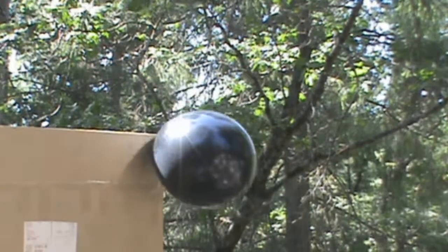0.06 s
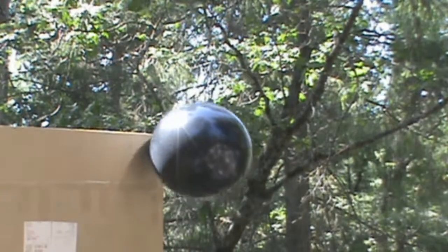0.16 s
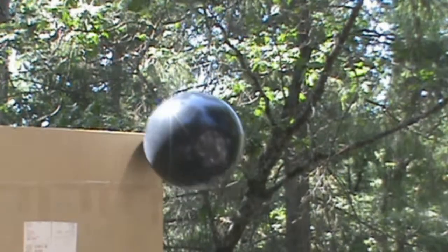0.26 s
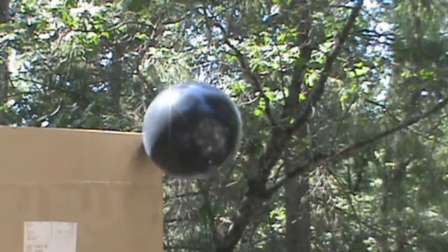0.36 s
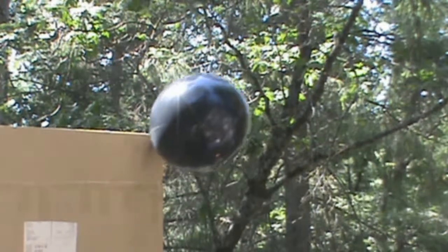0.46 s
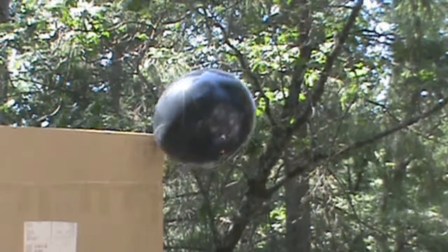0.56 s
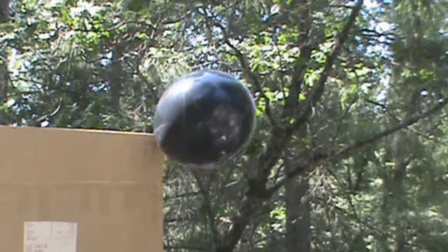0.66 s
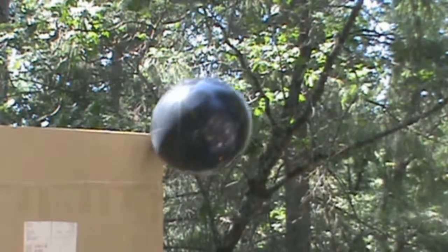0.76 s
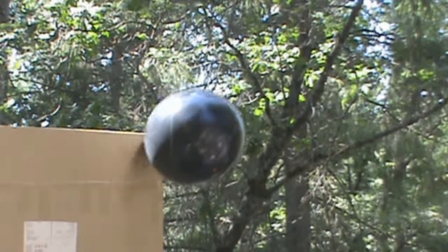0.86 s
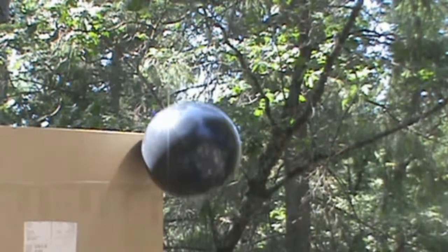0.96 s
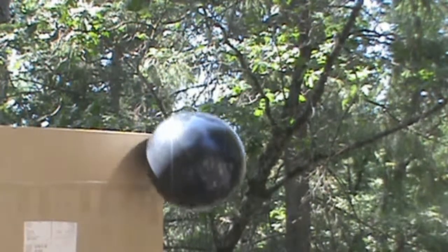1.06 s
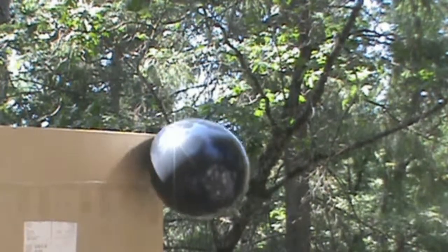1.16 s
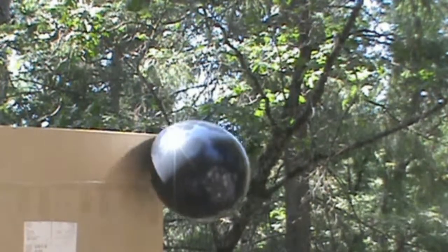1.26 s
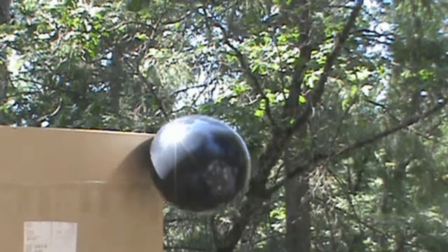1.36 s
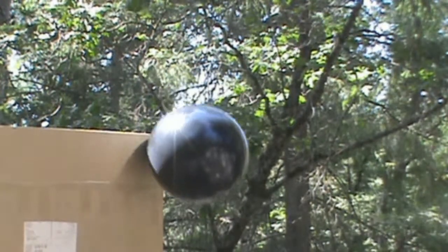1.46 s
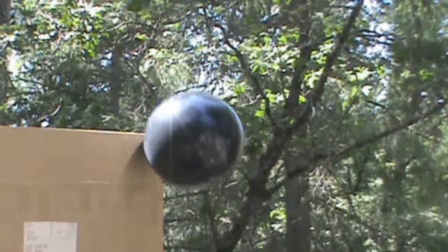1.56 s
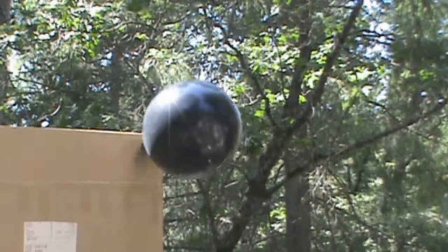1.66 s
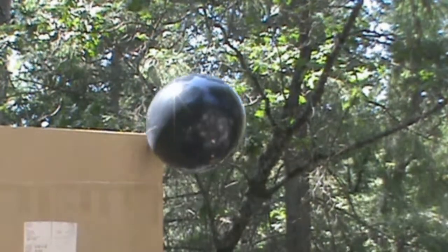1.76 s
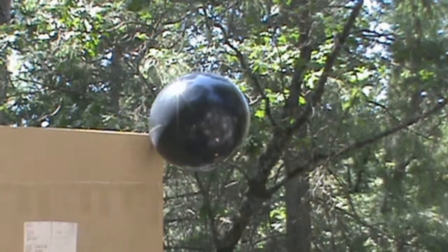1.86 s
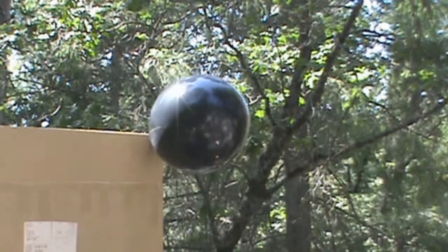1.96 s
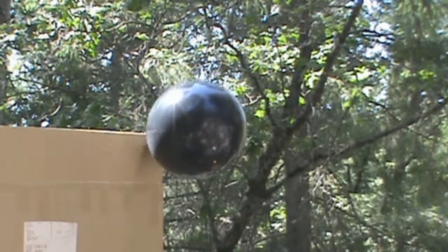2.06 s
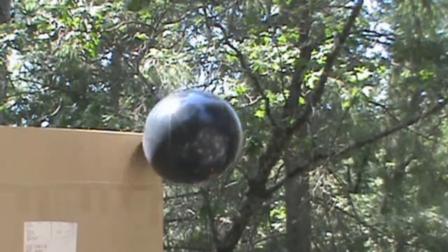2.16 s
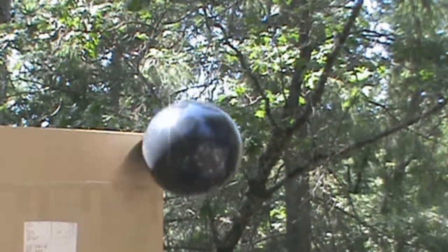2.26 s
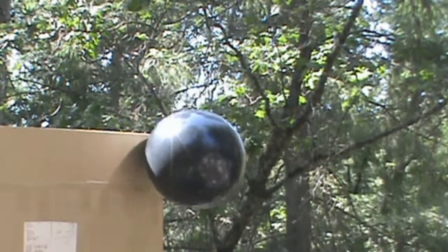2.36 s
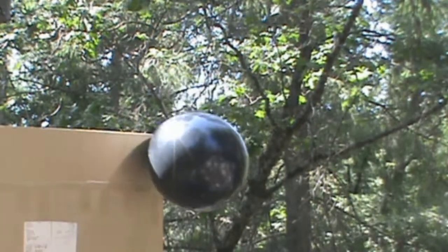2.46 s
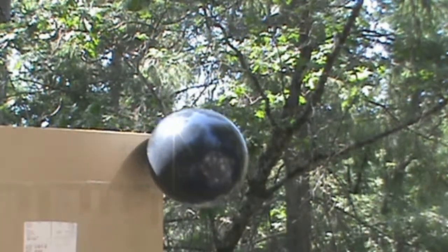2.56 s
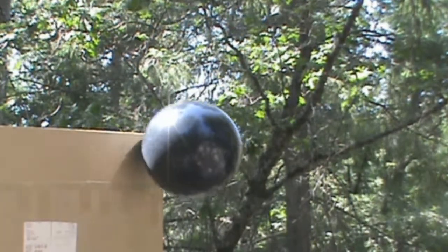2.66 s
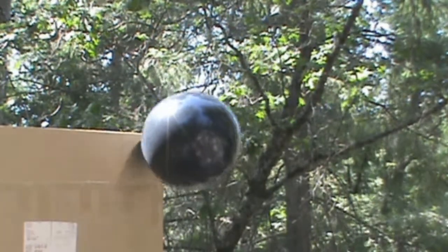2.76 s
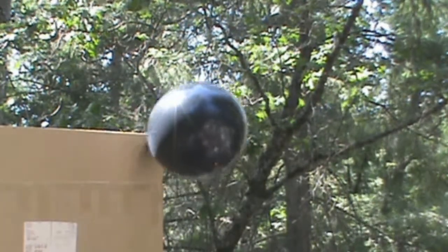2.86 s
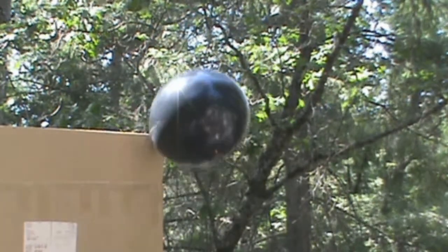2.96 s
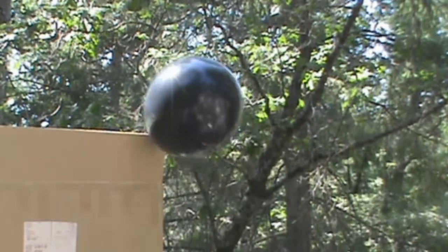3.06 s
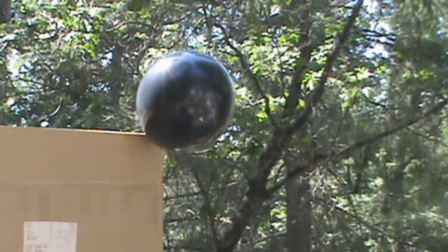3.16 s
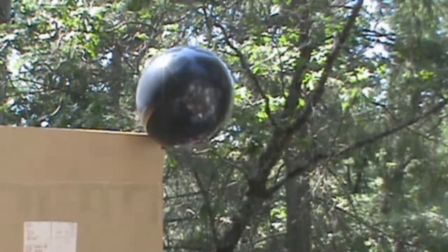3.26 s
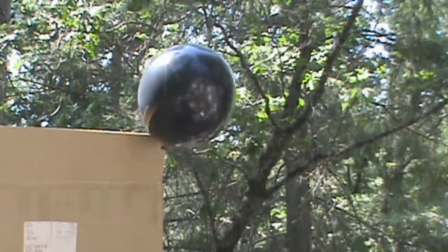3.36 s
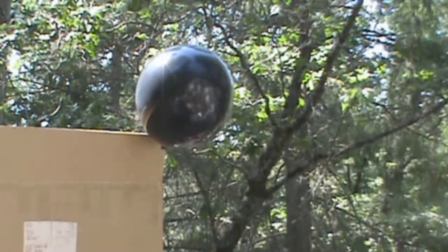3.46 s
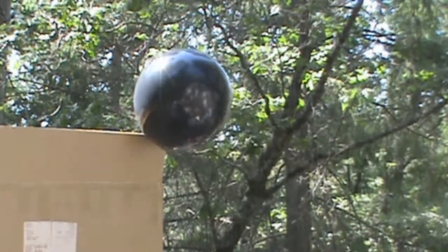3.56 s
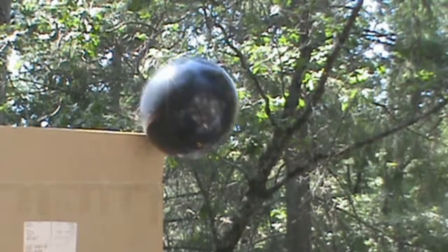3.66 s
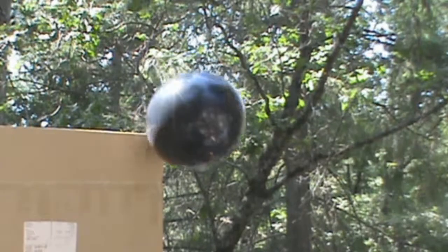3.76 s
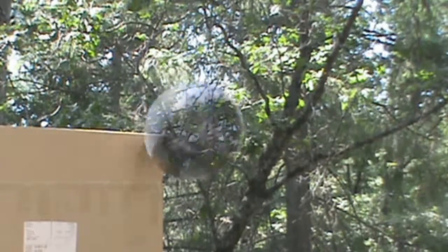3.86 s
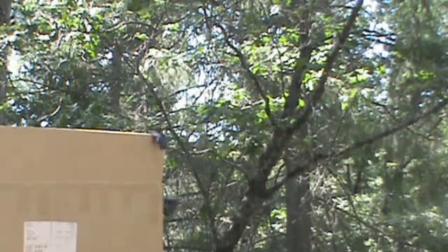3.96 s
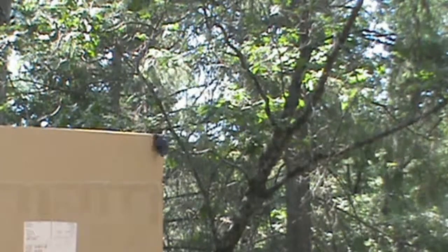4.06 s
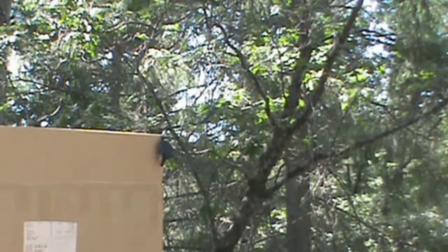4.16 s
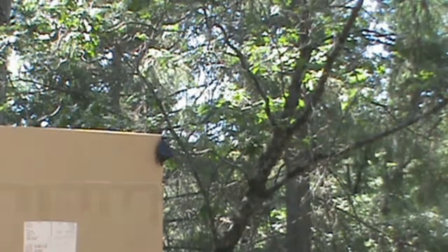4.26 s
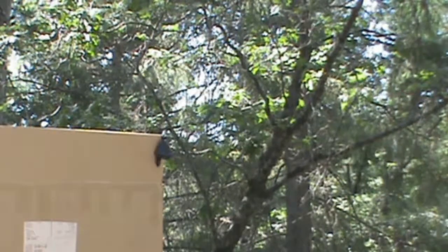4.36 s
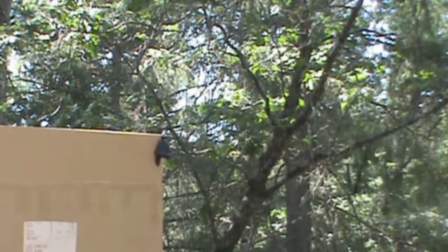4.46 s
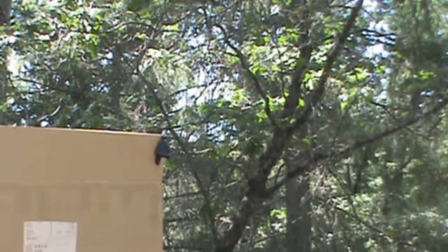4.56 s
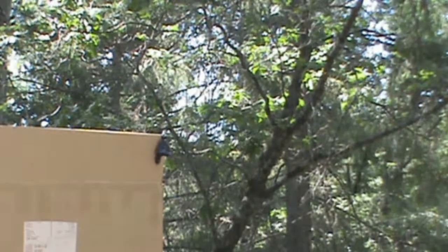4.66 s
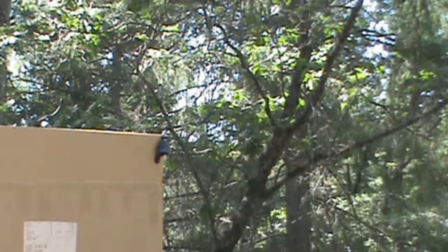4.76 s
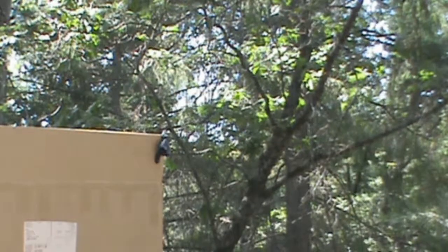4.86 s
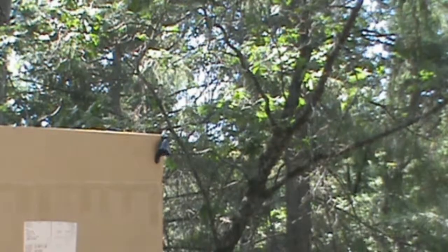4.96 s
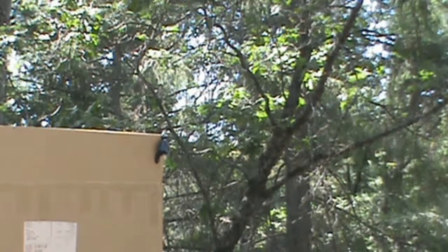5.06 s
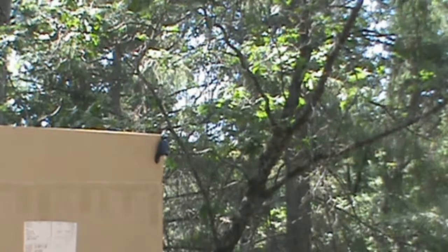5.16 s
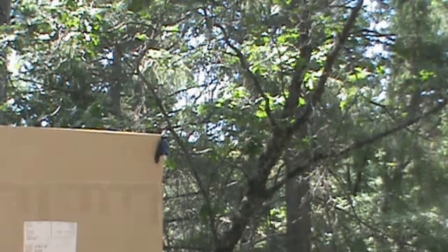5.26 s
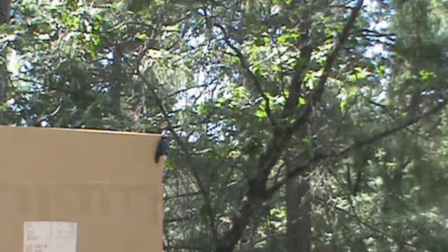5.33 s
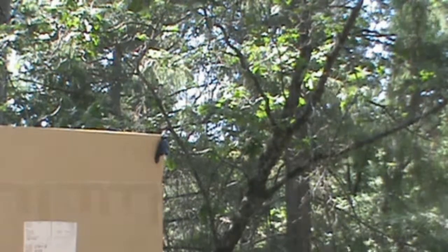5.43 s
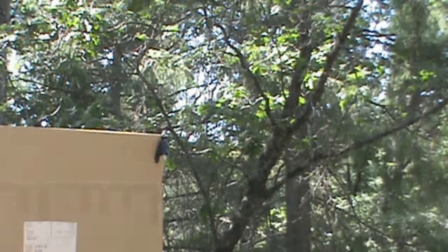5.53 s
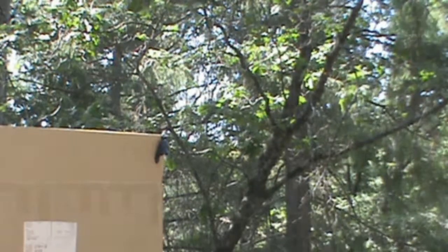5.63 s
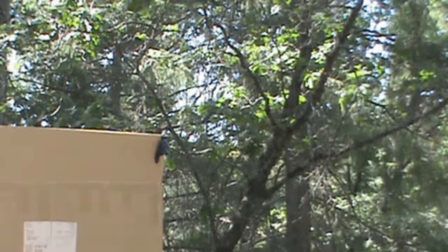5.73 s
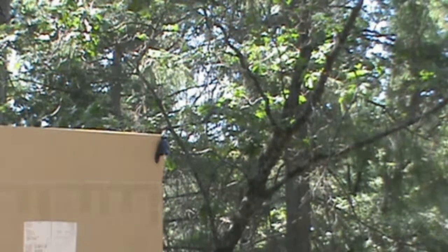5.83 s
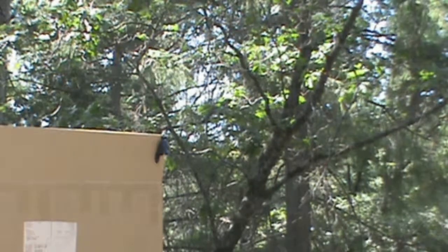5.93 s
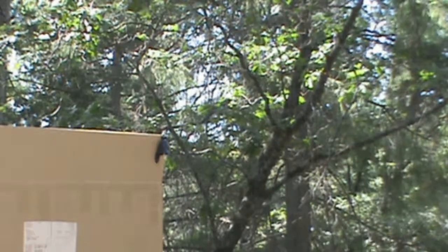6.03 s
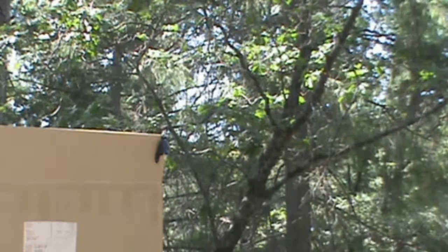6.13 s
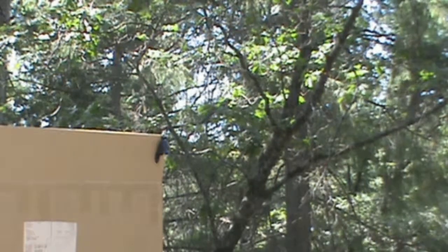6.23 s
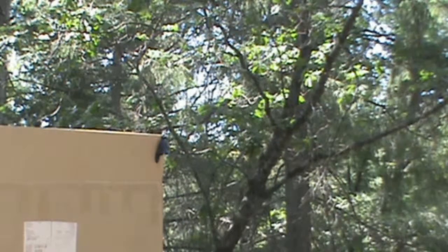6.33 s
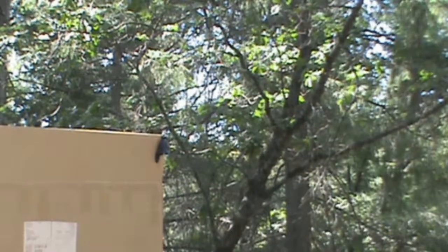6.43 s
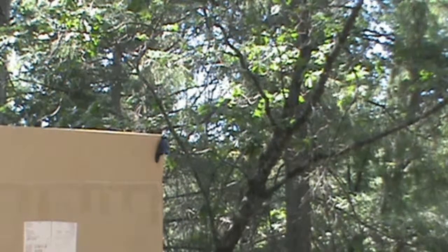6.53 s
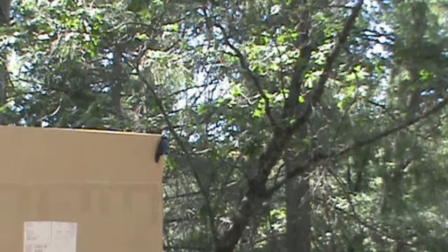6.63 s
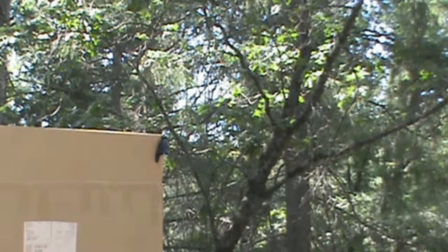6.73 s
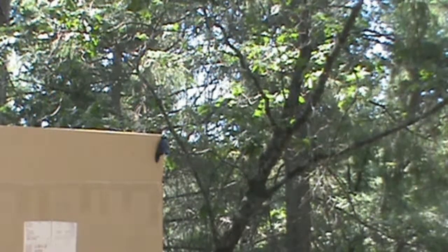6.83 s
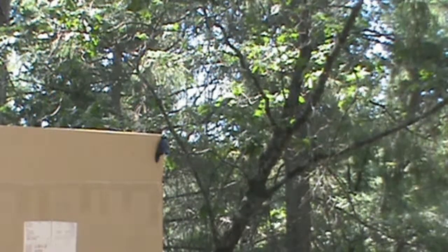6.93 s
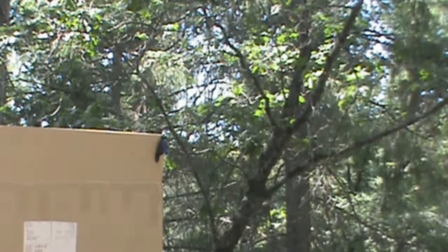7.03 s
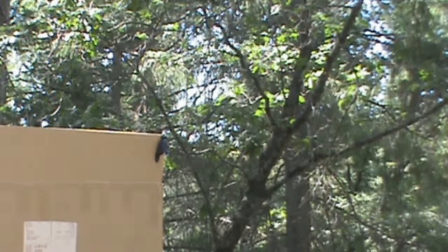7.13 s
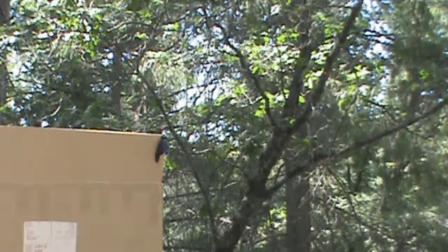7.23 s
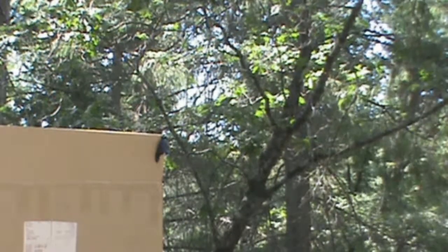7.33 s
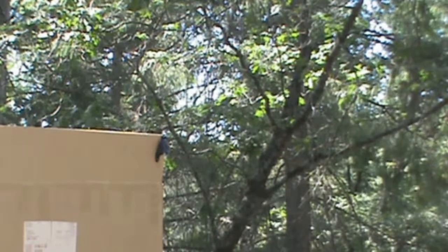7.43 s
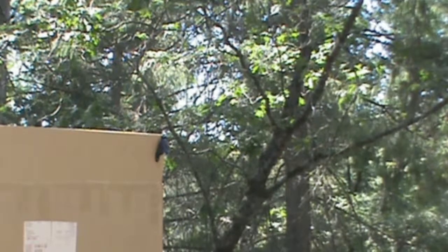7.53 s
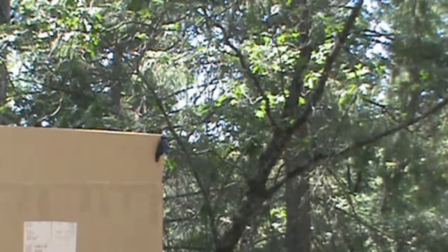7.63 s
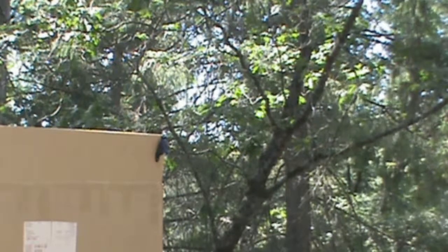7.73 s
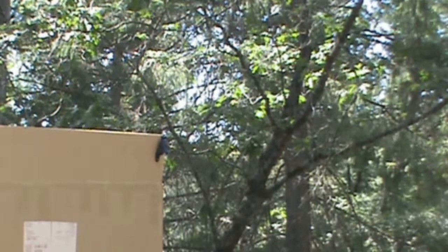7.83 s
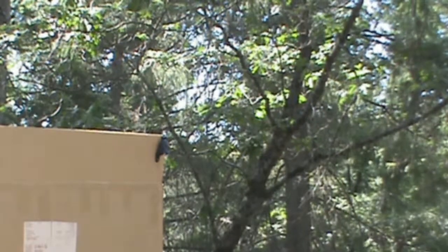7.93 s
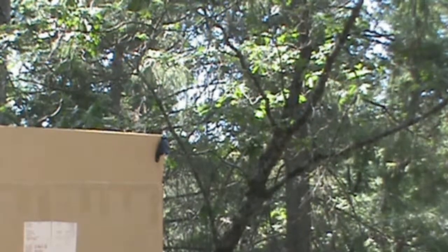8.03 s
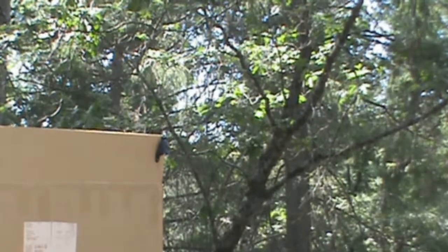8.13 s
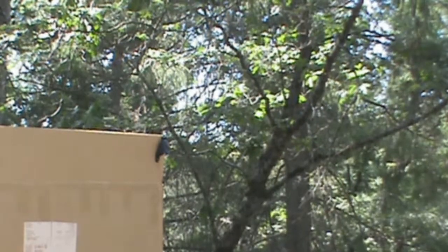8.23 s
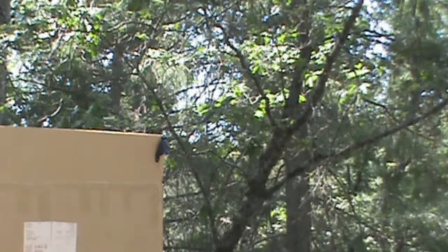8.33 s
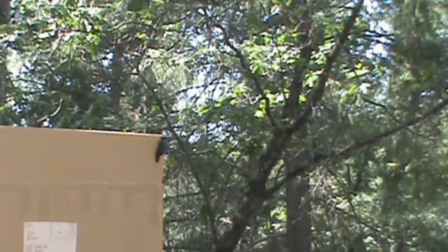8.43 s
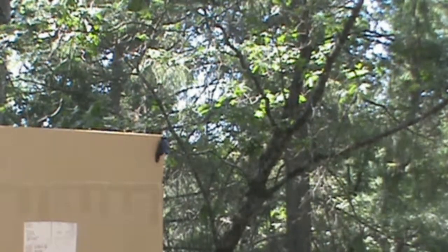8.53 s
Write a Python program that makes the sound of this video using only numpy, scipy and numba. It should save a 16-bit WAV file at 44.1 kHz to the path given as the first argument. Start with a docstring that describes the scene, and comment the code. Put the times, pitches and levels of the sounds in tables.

```python
"""Over a soft rush of distant air a latch ticks, parts scrape and click, and a launcher charges with a hiss.
Its firing valve squeaks open, hisses and cracks as the skewer leaves; a balloon bursts in a pressure wave.
After more handling a puff thumps out of the barrel, then come faint chirps and a thin whistle.
Hisses are shaped noise, clicks are noise bursts that ring the parts, echoes are convolved scatter.
A limiter holds the blasts down."""
import sys
import numpy as np
from scipy import signal
from scipy.fft import rfft, irfft, next_fast_len
from scipy.io import wavfile
from scipy.ndimage import uniform_filter1d
from numba import njit

SR = 44100
rng = np.random.default_rng(int(sys.argv[2]) if len(sys.argv) > 2 else 0)


def transcribe(u):
    """Save the signal u as a 16-bit wav file named by the first command-line argument.

    u: samples, shape (n,) or (channels, n), limited to [-1, 1]; the rate is SR.
    q: integer samples, one column per channel.
    """
    v = np.clip(np.atleast_2d(u).T, -1, 1)
    q = np.round(v * 32767).astype(np.int16)
    wavfile.write(sys.argv[1], SR, q)


N = 378995

# Barrel resonances that colour escaping air. Each row: centre in Hz, width in Hz, relative level in dB.
BARREL_RESONANCES = [(5470, 500, -17), (8130, 620, 1), (9200, 700, -2), (9800, 700, -3), (11100, 500, -2),
                     (11870, 600, 0)]


def undb(db):
    """Decibels to gain."""
    return 10 ** (np.asarray(db) / 20)


def unit(x):
    """Scale to rms 1."""
    return x / np.sqrt(np.mean(x ** 2))


def clock():
    """Time of every sample in seconds."""
    return np.arange(N) / SR


def lookup(rows, hz):
    """Interpolate (Hz, value) rows on a log-frequency axis."""
    points_hz, values = np.transpose(rows)
    return np.interp(np.log(hz), np.log(points_hz), values)


def shape(x, gain):
    """Filter by a gain that is a function of frequency."""
    size = next_fast_len(x.shape[-1])
    hz = np.maximum(np.arange(size // 2 + 1) * SR / size, 1)
    return irfft(rfft(x, size) * gain(hz), size)[..., :x.shape[-1]]


def colour(x, rows):
    """Filter by a gain curve of (Hz, dB) rows."""
    return shape(x, lambda hz: undb(lookup(rows, hz)))


def hump(x, centre_hz, octaves):
    """Keep one band with soft skirts."""
    return shape(x, lambda hz: 1 / (1 + (np.log2(hz / centre_hz) / octaves) ** 2 / 2) ** 2)


def dull(x, corner_hz):
    """Roll off the treble, 18 dB an octave."""
    return shape(x, lambda hz: 1 / np.hypot(1, (hz / corner_hz) ** 3))


def noise(count=N):
    """White noise."""
    return rng.standard_normal(count)


def place(x, pan_db):
    """Mono to stereo with a level difference; positive favours the left."""
    return x * undb(np.array([[pan_db], [-pan_db]]) / 2)


def add(out, s, x):
    """Mix x in at time s."""
    start = int(s * SR)
    out[..., start:start + x.shape[-1]] += x[..., :out.shape[-1] - start]


def gate(span_s, attack_s, release_s):
    """Gain that climbs its last 30 dB over the attack, holds to the span's end, then loses 30 dB per release."""
    t = clock()
    rise = np.minimum((t - span_s[0]) / attack_s - 1, 0)
    fall = np.maximum(t - span_s[1], 0) / release_s
    return undb(np.maximum(30 * (rise - fall), -200))


def bell(length_s):
    """Smooth rise and fall; each half lasts length_s, four standard deviations."""
    t = np.arange(-int(length_s * SR), int(length_s * SR)) / SR
    return np.exp(-8 * (t / length_s) ** 2)


def jet(flow, spectrum, flutter_db):
    """Turbulent air whose level follows the flow and flutters within milliseconds."""
    flutter = unit(uniform_filter1d(noise(), size=180))
    return unit(colour(noise(), spectrum)) * undb(flutter_db * flutter) * flow


def resonant(modes):
    """Turbulence heard through steep (Hz, width Hz, dB) resonances, rms 1."""
    def gain(hz):
        return sum(undb(db) / (1 + (2 * (hz - f) / width) ** 2) ** 2 for f, width, db in modes)
    return unit(shape(noise(), gain))


def pressure_wave(length_s, low_hz=110):
    """A sudden overpressure that swings through suction back to rest; a small source radiates no deep bass."""
    t = np.arange(int(.03 * SR)) / SR / length_s
    high_pass = signal.butter(2, low_hz, "high", fs=SR, output="sos")
    return signal.sosfilt(high_pass, (1 - t) * np.exp(-t))


def strike(s, peak_db, hz, octaves, t60, skirt_db=-12, ring_db=-37):
    """One contact: a brief crack with wide skirts, whose strongest band rings the launcher's parts faintly."""
    # Ringing parts. Each row: pitch in Hz, t60 in seconds, relative level in dB.
    part_rings = [(3406, 0.042, -6.5), (3500, 0.036, -10.5), (5070, 0.038, -6.5), (6020, 0.042, -18),
                  (7160, 0.041, 1.5), (8080, 0.0388, 6), (9700, 0.044, 6)]
    out, t = np.zeros(N), np.arange(int(.15 * SR)) / SR
    rings = sum(undb(db - 60 * t / ring_t60) * np.cos(2 * np.pi * f * t) for f, ring_t60, db in part_rings)
    body = undb(ring_db) * rings
    body[0] += 1  # direct sound
    lead_s = .005  # room for the filters to spread ahead of the contact
    contact = noise(len(t)) * undb(-60 * np.abs(t - lead_s) / t60) * (t >= lead_s)
    skirt = undb(skirt_db) * hump(contact, hz, octaves=1.9)
    hit = signal.fftconvolve(hump(contact, hz, octaves), body)[:len(t)] + skirt
    add(out, s - lead_s, hit * undb(peak_db) / np.abs(hit).max())
    return out


def forest_air(mid_db=-51, sway_db=0.47):
    """A soft rush from afar, nearly the same in both ears in the bass, swaying slightly in level."""
    # Spectrum. Each row: frequency in Hz, level in dB.
    air_spectrum = [(13, -39), (22, -9.5), (44, -1.5), (72, -11), (106, -1), (143, -7.5), (241, -5.5),
                    (326, -4.5), (454, -2), (686, -3), (1330, -13), (2870, -23), (3200, -22.5), (8620, -26),
                    (15800, -24)]
    # Stereo width. Each row: frequency in Hz, side minus mid in dB.
    side_spectrum = [(60, -18), (110, -22), (200, -16), (380, -15.5), (700, -10.5), (1290, -4.5),
                     (2380, -2.5), (4400, -4), (8120, -3), (15000, -10.5)]
    mid = colour(noise(), air_spectrum)
    side = colour(colour(noise(), air_spectrum), side_spectrum)
    sway = unit(hump(noise(), centre_hz=1.44, octaves=0.27))
    return (mid + side * np.array([[1], [-1]])) / np.std(mid) * undb(mid_db + sway_db * sway)


def latch(start_s=.0963, gap_s=.0049, peak_db=-20.5, hz=3350, first_pan_db=-13, pan_step_db=8):
    """A latch chatters over its teeth: three evenly spaced ticks, each further to the left."""
    ticks = [strike(start_s + k * gap_s, peak_db, hz, octaves=.22, t60=.008) for k in range(3)]
    return sum(place(tick, first_pan_db + k * pan_step_db) for k, tick in enumerate(ticks))


def scrapes(band_octaves=1.48, grit_db=3.5, hollow_db=-6.0, hollow_hz=330, top_hz=11000):
    """Sliding parts: dense tiny slips that swell and fade, and stir the hollow body."""
    # Each row: peak time in seconds, half-length in seconds, level of the main band in dB, centre in Hz.
    slides = [(0.244, 0.093, -43.5, 4400), (.34, 0.22, -54.5, 5500), (0.719, .07, -48.5, 2200),
              (1.03, .1, -57.5, 3520), (1.112, 0.067, -55, 2400), (1.611, 0.11, -47.5, 2870),
              (1.656, 0.075, -42, 2500), (1.711, .13, -42, 2970), (3.701, .06, -52.5, 1100),
              (5.521, .09, -52.5, 6030), (7.258, 0.17, -58.5, 2800), (8.03, .5, -59.5, 5350),
              (8.292, 0.28, -57.5, 4450)]
    out = np.zeros(N)
    for s, length_s, db, hz in slides:
        push = bell(length_s)
        grit = unit(uniform_filter1d(noise(len(push)), size=30))
        slips = noise(len(push)) * undb(grit_db * grit)
        hollow = undb(hollow_db) * unit(hump(slips, hollow_hz, octaves=2.0))
        rub = unit(hump(slips, hz, band_octaves)) + hollow
        add(out, s - length_s, rub * undb(db) * push)
    return place(dull(out, top_hz), pan_db=-3.5)


def clicks(octaves_at_2khz=.9):
    """Small parts click, the higher the narrower in band; the hollow body gives dull knocks."""
    # Small parts. Each row: time in seconds, peak in dB, centre in Hz, t60 in seconds.
    small_hits = [(.223, -31, 2200, 0.033), (0.251, -23, 14500, 0.016), (0.279, -32.5, 5170, 0.034),
                  (0.7878, -26.5, 4900, 0.054), (1.2936, -37.5, 6700, 0.011), (1.5079, -25, 1650, 0.0099),
                  (1.654, -25.5, 2590, 0.028), (1.732, -28.5, 2600, 0.015), (5.484, -35.5, 7000, 0.049),
                  (5.499, -35, 2300, 0.033), (6.868, -30, 5500, .012), (6.8714, -22, 3900, 0.046),
                  (7.271, -35, 1400, .02), (7.6624, -39, 2200, .04), (7.744, -41, 3985, 0.017),
                  (8.0185, -29, 4500, .009)]
    # Hollow body. Each row: time in seconds, peak in dB before dulling, centre in Hz, t60 in seconds.
    hollow_hits = [(.298, -34, 440, .04), (.643, -34, 258, 0.024), (1.624, -30, 470, 0.14),
                   (7.87, -30, 215, .055)]
    small = sum(strike(s, db, hz, octaves_at_2khz * np.sqrt(2000 / hz), t60) for s, db, hz, t60 in small_hits)
    hollow = sum(strike(s, db, hz, octaves=.9, t60=t60) for s, db, hz, t60 in hollow_hits)
    return place(small, pan_db=-4.0) + place(dull(hollow, corner_hz=650), pan_db=-1.0)


def charging(gap_db=-24.0, hiss_db=-26, open_db=-14):
    """The narrow valve gap sings in its resonances, then opens into a broad hiss."""
    # Gap resonances. Each row: centre in Hz, width in Hz, relative level in dB.
    gap_resonances = [(920, 70, -3.5), (3950, 490, 1), (5820, 1200, 3), (7800, 870, 1), (8600, 1600, 4.5),
                      (10800, 2500, 0.5), (12600, 1200, 3), (14400, 1700, 0)]
    # Jet spectra, barely open and wide open. Each row: frequency in Hz, relative level in dB.
    pinched_spectrum = [(120, -74), (200, -71), (906, -24), (3120, -26.5), (3890, -20), (8050, -16),
                        (15500, -14.5)]
    open_spectrum = [(59, -63), (100, -17), (420, -23.5), (898, -20.5), (1130, -20), (9740, -2),
                     (15500, -1.5)]
    # spans: opens, starts to close
    pinched = gate((.47, .56), attack_s=.028, release_s=0.044)
    wide = gate((.545, .612), attack_s=0.026, release_s=0.078)
    singing = resonant(gap_resonances) * pinched * undb(gap_db)
    hiss = undb(hiss_db) * jet(pinched, pinched_spectrum, flutter_db=0.0)
    rush = undb(open_db) * jet(wide, open_spectrum, flutter_db=2.0)
    return place(singing + hiss + rush, pan_db=-3.0)


def shot(open_s=3.912, shut_s=4.216, full_db=-3.5, first_gap=.1, travel_s=.23, drain_db_per_s=46,
         muzzle_s=3.9472, muzzle_db=-2.5, overtone_db=-3, barrel_db=-9, squeak_db=-2.5,
         muffled_db=-1.0, muffled_hz=9500):
    """The valve squeaks open; its hiss is muffled until the skewer cracks out, as the tank drains via the gap."""
    # Hiss. Each row: frequency in Hz, relative level in dB.
    shot_spectrum = [(88, -60), (150, -30), (445, -29), (966, -24), (1240, -19.5), (2860, -13),
                     (6230, -3.5), (6600, -4.5), (9000, 3), (12300, 1), (15500, -11.5)]
    # Valve squeaks. Each row: start in seconds, relative level in dB, first and last pitch in Hz.
    squeaks = [(3.915, -21.5, 3720, 5300), (3.921, -16.5, 3570, 5300), (3.925, -17, 7200, 9800)]
    # gap as a share of the full one; travel_s is for the whole way from shut
    gap = np.clip(first_gap + (clock() - open_s) / travel_s, 0, 1)
    gap = gap * gate((open_s, shut_s), attack_s=.0055, release_s=.0055)
    drained_db = drain_db_per_s * np.cumsum(gap) / SR
    flow = gap * undb(full_db - drained_db)
    free = jet(flow, shot_spectrum, flutter_db=1.4) + undb(barrel_db) * resonant(BARREL_RESONANCES) * flow
    muffled = undb(muffled_db) * dull(free, muffled_hz)
    out = np.where(clock() < muzzle_s, muffled, free)
    window = np.hanning(int(.004 * SR))
    for s, db, start_hz, end_hz in squeaks:
        phase = 2 * np.pi * np.cumsum(np.linspace(start_hz, end_hz, len(window))) / SR
        tone = np.sin(phase) + undb(overtone_db) * np.sin(2 * phase)
        add(out, s, undb(db + squeak_db) * window * tone)
    crack = strike(muzzle_s, muzzle_db, 4500, octaves=2.2, t60=.005)
    return place(out + crack, pan_db=-2.0)


def balloon(pop_s=4.022, snap_db=-4, flap_db=-5.0, flap_s=0.019, fade_t60=0.13,
            box_db=-15, box_hz=250, box_t60=0.096):
    """The skin rips with one pressure wave; the rubber slaps the cardboard box, which booms briefly."""
    # Rubber slaps. Each row: frequency in Hz, relative level in dB.
    flap_spectrum = [(82, -26), (140, -2.5), (293, -3), (789, -12.5), (1310, -3.5), (1870, -6),
                     (2230, -11.5), (2780, -9.5), (4310, -11.5), (6000, -14), (7800, -33), (13200, -120)]
    t = np.arange(int(.3 * SR)) / SR
    after_s = np.maximum(t - flap_s, 0)
    flaps = unit(colour(noise(len(t)), flap_spectrum)) * undb(-60 * after_s / fade_t60)
    box = unit(hump(noise(len(t)), box_hz, octaves=0.7)) * undb(-60 * after_s / box_t60)
    out = np.zeros(N)
    add(out, pop_s, -undb(snap_db) * pressure_wave(length_s=0.00054, low_hz=172))  # inverted
    add(out, pop_s + 0.00202, undb(flap_db) * flaps + undb(box_db) * box)
    return place(out, pan_db=-1.5)


def puff(hiss_db=-19, ring_db=-25, front_db=-14, thump_db=-13, thump_hz=250, thump_t60=0.02,
         barrel_db=-26.5, barrel_hz=155, barrel_t60=0.2):
    """A pressure front leaves the empty barrel, the air column thumps, and the rest hisses out."""
    # Hiss. Each row: frequency in Hz, relative level in dB.
    puff_spectrum = [(47, -33), (80, -3), (466, -7.5), (607, -1), (809, -12.5), (1500, -8.5), (1670, -16.5),
                     (9980, -5.5), (15500, -7)]
    flow = gate((6.682, 6.711), attack_s=0.0045, release_s=0.045)  # opens, starts to close
    out = undb(hiss_db) * jet(flow, puff_spectrum, flutter_db=1.0)
    out = out + undb(ring_db) * resonant(BARREL_RESONANCES) * flow
    t = np.arange(int(.3 * SR)) / SR
    swell = 1 - np.exp(-t * thump_hz * 2)
    thump = np.sin(2 * np.pi * thump_hz * t) * swell * undb(-60 * t / thump_t60)
    boom = unit(hump(noise(len(t)), barrel_hz, octaves=0.55)) * swell * undb(-60 * t / barrel_t60)
    add(out, 6.6812, undb(front_db) * pressure_wave(length_s=0.00062))
    add(out, 6.6833, undb(thump_db) * thump)
    add(out, 6.684, undb(barrel_db) * boom)
    return place(out, pan_db=-2.4)


def chirps(pitch_hz=8200, length_s=.065):
    """Faint, airy notes on one very high pitch, perhaps a small bird: narrow noise under a bell."""
    # Each row: peak time in seconds, level in dB.
    chirp_notes = [(7.16, -60.5), (7.385, -59.5), (7.485, -59.5), (7.548, -62), (7.68, -61)]
    out, note = np.zeros(N), bell(length_s)
    for s, db in chirp_notes:
        add(out, s - length_s, undb(db) * note * unit(hump(noise(len(note)), pitch_hz, octaves=0.23)))
    return place(out, pan_db=-3)


def whistle(level_db=-68, pitch_hz=4130, upper_hz=5000, upper_db=-9):
    """A thin, airy tone with a weaker one above it, both narrow noise; their level wavers."""
    waver = undb(1.5 * unit(hump(noise(), centre_hz=9, octaves=0.8)))
    low = unit(hump(noise(), pitch_hz, octaves=.07))
    high = unit(hump(noise(), upper_hz, octaves=.07))
    swell = gate((7.15, 8.3), attack_s=.22, release_s=2.4)  # starts, begins to fade
    tone = (low + undb(upper_db) * high) * swell * undb(level_db)
    return place(tone * waver, pan_db=0)


def outdoors(blasts, handling, near_db=-5, near_t60=0.15, build_s=0.02, handling_echo_db=-4,
             forest_pan_db=1.5):
    """Close surfaces scatter sparse early echoes; trunks and crowns return a long tail that loses its treble."""
    # Tail decay. Each row: frequency in Hz, t60 in seconds.
    forest_t60 = [(150, 0.7), (1400, 1.21), (3000, 0.98), (6000, 0.51), (10000, 0.37), (15000, 0.37)]
    # Tail spectrum. Each row: frequency in Hz, level in dB.
    forest_echo = [(100, -27.5), (600, -9.5), (1400, -13), (4000, -12.5), (9000, -15), (15000, -26)]
    t = np.arange(int(1.3 * SR)) / SR
    sparse = rng.standard_normal((2, len(t))) * (rng.random((2, len(t))) < .06)
    near = undb(near_db) * unit(sparse * undb(-60 * t / near_t60) * (t > .001)) / np.sqrt(len(t))
    # long waves reach both ears alike
    near = near[0] + shape(near - near[0], lambda hz: hz / np.hypot(hz, 400))
    scatter, far = rng.standard_normal((2, len(t))), 0
    for centre_hz in 62.5 * 2 ** np.arange(0, 8.5, .5):
        band = shape(scatter, lambda hz: np.maximum(1 - 2 * np.abs(np.log2(hz / centre_hz)), 0))
        fade = undb(-60 * t / lookup(forest_t60, centre_hz)) * (1 - np.exp(-t / build_s))
        far = far + band * unit(fade) / np.sqrt(len(t)) * undb(lookup(forest_echo, centre_hz))
    direct = blasts + handling
    # the blasts are aimed at the trees, so they stir the long tail most
    to_trees = blasts + undb(handling_echo_db) * handling
    tail = signal.fftconvolve(to_trees, place(far, forest_pan_db), axes=1)
    return direct + (signal.fftconvolve(direct, near, axes=1) + tail)[:, :N]


def ear_phase(x, spread_rad=0.31, corner_hz=400):
    """Left and right differ in phase by a random ripple over frequency that shrinks in the bass."""
    points_hz = np.linspace(0, SR / 2, 130)
    ripple_rad = spread_rad * noise(len(points_hz))
    sides = np.array([[1], [-1]])

    def turn(hz):
        return np.exp(1j * sides * np.interp(hz, points_hz, ripple_rad) * hz / np.hypot(hz, corner_hz))
    return shape(x, turn)


def scene():
    """Launcher and balloon among the trees."""
    blasts = charging() + shot() + balloon() + puff()
    handling = latch() + clicks() + scrapes() + chirps() + whistle()
    return ear_phase(outdoors(blasts, handling)) + forest_air()


@njit
def follow(x, attack_s, release_s):
    """Envelope that rises and falls at different speeds."""
    out, e = np.empty(len(x)), 0.
    for i in range(len(x)):
        e += (x[i] - e) / (SR * (attack_s if x[i] > e else release_s))
        out[i] = e
    return out


def record(dry, limit_db=-16.0, release_s=0.0064, hold_share=0.47, recover_s=1.0, top_hz=15850):
    """A fast limiter flattens the blasts; part of its gain comes back only slowly. The top is cut."""
    power = uniform_filter1d(np.mean(dry ** 2, axis=0), size=64)
    level_db = 10 * np.log10(np.maximum(power, 1e-12))
    fast_db = follow(np.maximum(level_db - limit_db, 0), 0.00071, float(release_s))
    slow_db = follow(hold_share * fast_db, 0.06, float(recover_s))
    limited = dry * undb(-np.maximum(fast_db, slow_db))
    return signal.sosfilt(signal.ellip(12, .1, 80, top_hz, fs=SR, output="sos"), limited)


dry = scene()
out = record(dry)
transcribe(out)
```